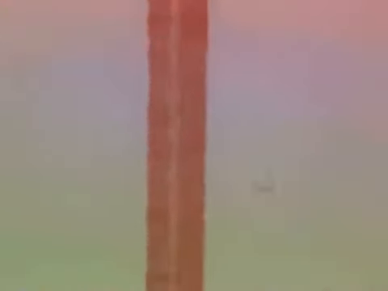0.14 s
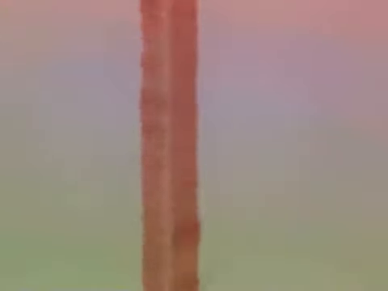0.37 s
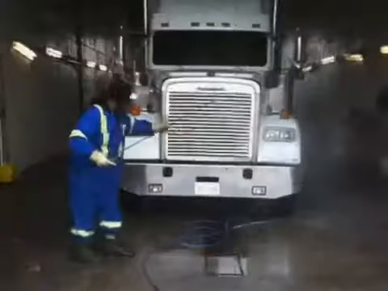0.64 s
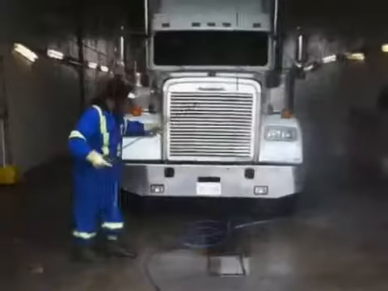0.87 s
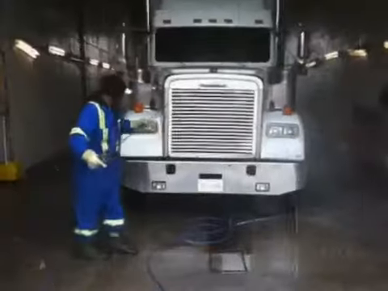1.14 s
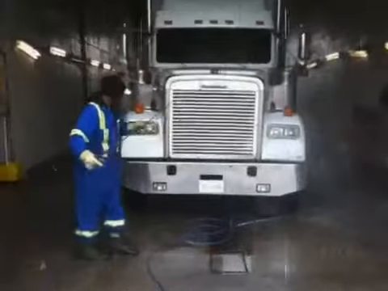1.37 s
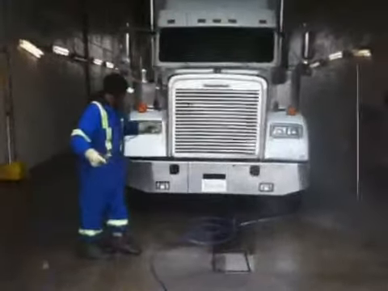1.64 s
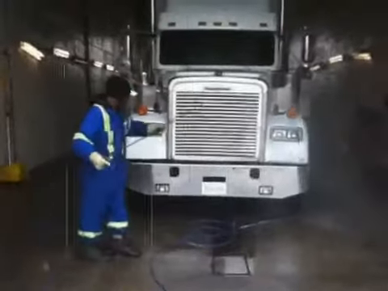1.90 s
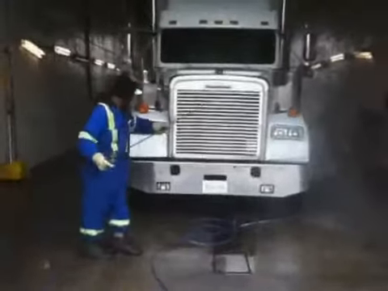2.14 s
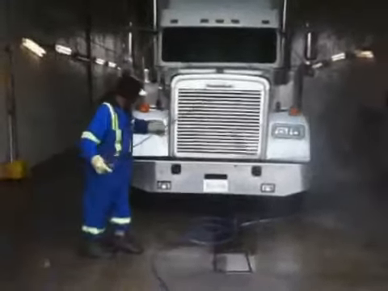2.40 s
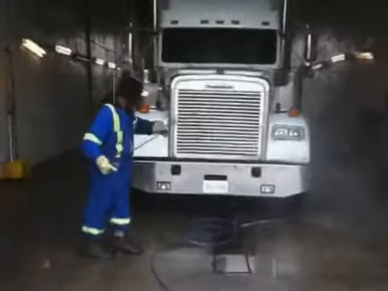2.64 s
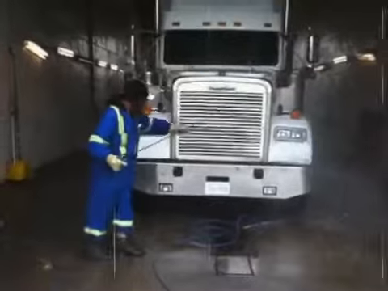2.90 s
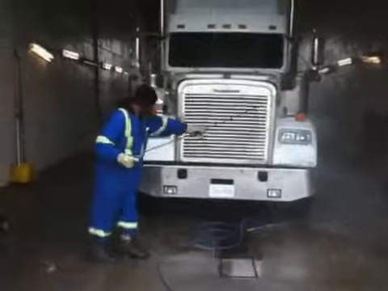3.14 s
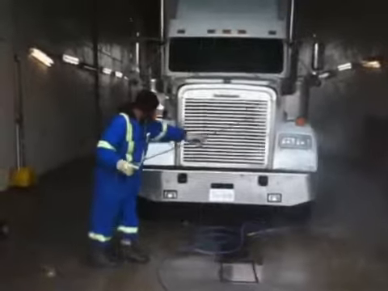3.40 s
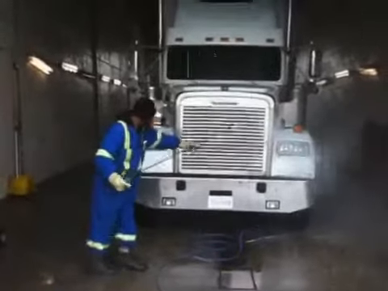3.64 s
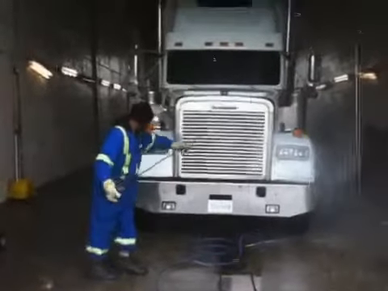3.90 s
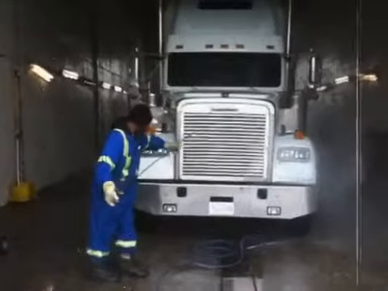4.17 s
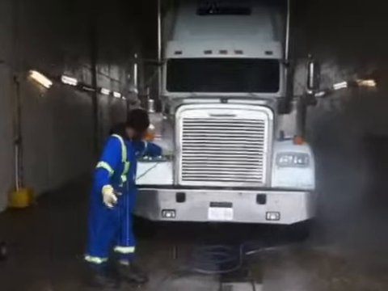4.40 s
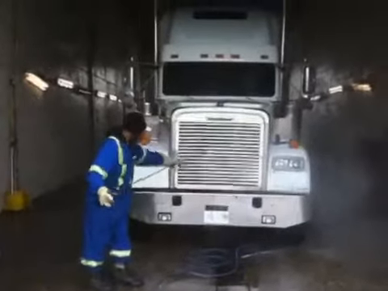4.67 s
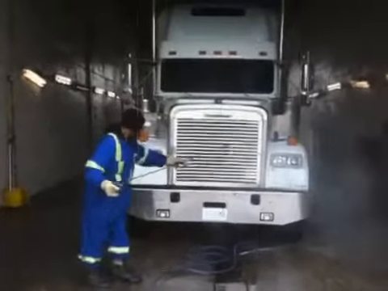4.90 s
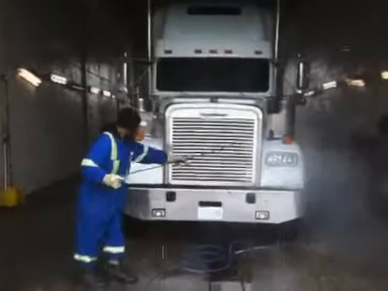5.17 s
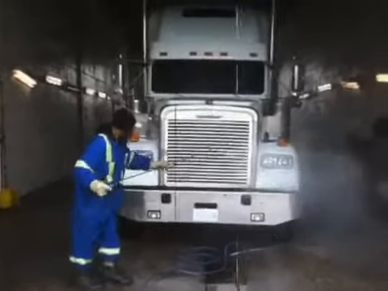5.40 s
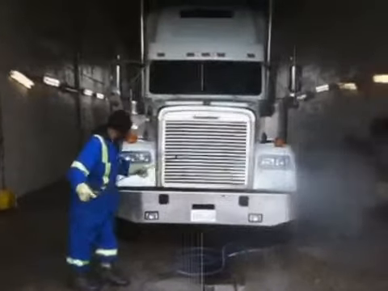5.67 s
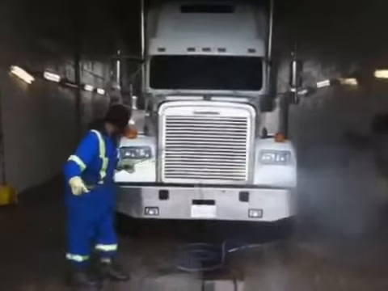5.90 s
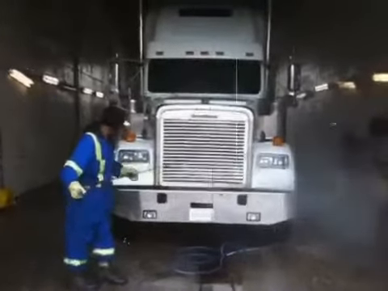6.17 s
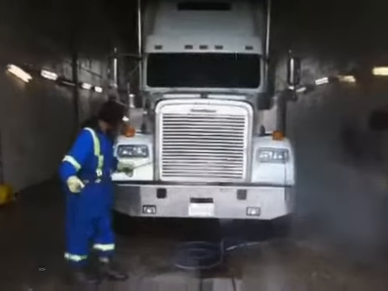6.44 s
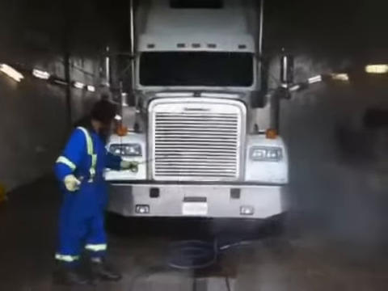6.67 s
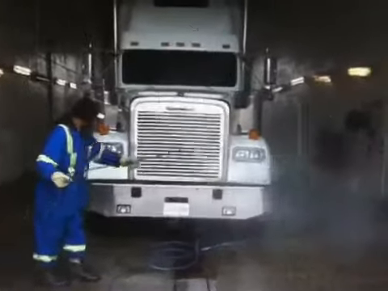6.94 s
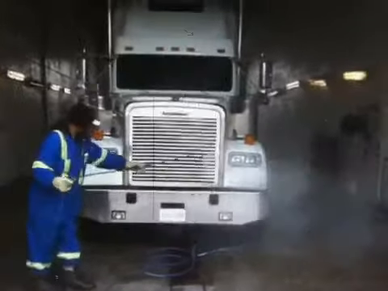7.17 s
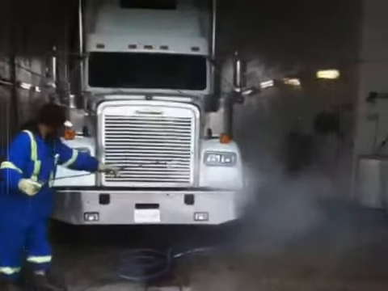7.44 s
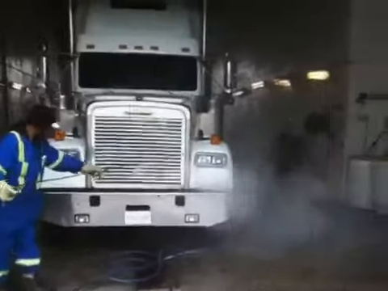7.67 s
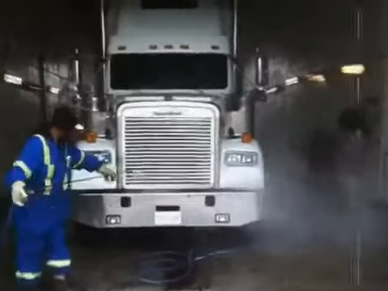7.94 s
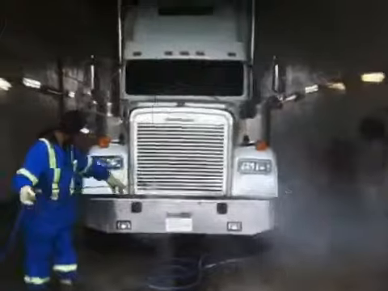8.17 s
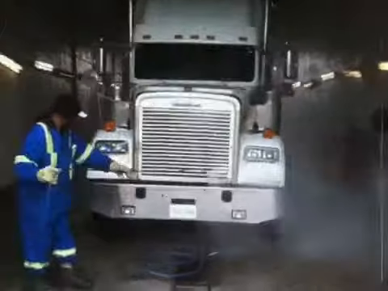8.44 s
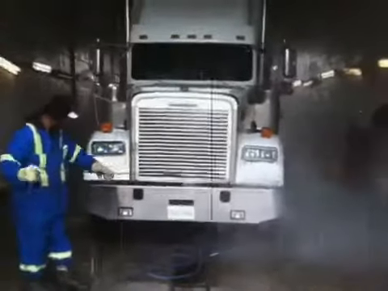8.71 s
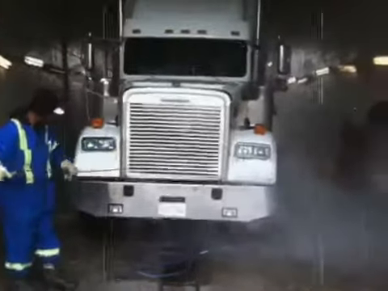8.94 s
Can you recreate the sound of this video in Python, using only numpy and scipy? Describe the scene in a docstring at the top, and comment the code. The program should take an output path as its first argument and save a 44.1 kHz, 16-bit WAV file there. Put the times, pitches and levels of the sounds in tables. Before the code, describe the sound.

One microphone in a concrete wash bay, mono. After a short silence, continuous high-pressure water starts abruptly: nozzle hiss with faint airy whistle, drops battering metal slats, fine bright mist. The colour shifts as the aim sweeps, with quick surges and dips. Around seven to nine seconds panels drum more heavily and hollows boom. A quiet wavering pump hum and bass rumble continue underneath.

```python
"""A high-pressure jet sweeps over the grille and bumper of a truck in a concrete wash bay, after an abrupt start.
Drops batter the slats and the panels drum: noise and random impacts through broad resonances, with the nozzle hiss.
Gliding and fixed narrow noise bands give the grazed slats and the nozzle whistle; brighter spray is the mist.
Shaped noise makes the hollow boom, the roar and the building rumble; wavering sines make the pump hum."""
import sys
import numpy as np
from scipy import signal
from scipy.fft import rfft, irfft, next_fast_len
from scipy.io import wavfile
from scipy.ndimage import uniform_filter1d, map_coordinates

SR = 44100
rng = np.random.default_rng(int(sys.argv[2]) if len(sys.argv) > 2 else 0)


def boost(x):
    """Linear amplitude factor 10**(x/20) for a level x in decibels (scalar or array-like)."""
    u = np.asarray(x, float) / 20
    return 10 ** u


def pcm_store(signal):
    """Save signal as 16-bit PCM."""
    levels = np.round(np.clip(np.atleast_2d(signal), -1, 1) * 32767)
    wavfile.write(sys.argv[1], SR, levels.astype(np.int16).T)


N = 399987
START_S, TOP_HZ = 0.672, 15740

# Base levels where the jet lands. Each row: time in seconds, splash on slats in dB,
# drumming of panels in dB, nozzle hiss in dB.
JET_LEVELS = [(.68, -30.5, -34.5, -30.5), (.8, -29, -32.5, -29.5), (1.1, -26, -33.5, -28),
              (1.55, -25.5, -32, -27.5), (2.05, -28.5, -33.5, -31), (2.4, -24.5, -32, -28),
              (2.95, -23, -31.5, -28.5), (3.4, -23.5, -30, -29), (3.65, -27, -33.5, -30),
              (4.15, -25.5, -31.5, -28), (4.8, -23.5, -30, -27), (5.25, -22.5, -30, -29.5),
              (5.5, -25.5, -32.5, -29), (6.05, -23, -31, -27.5), (6.8, -22.5, -29, -29),
              (7.15, -22, -22.5, -30), (7.55, -21, -23, -29.5), (8.05, -22.5, -20.5, -31.5),
              (8.38, -20.5, -24, -28.5), (8.89, -21.5, -24.5, -30), (8.95, -24, -30.5, -26.5),
              (9.07, -22, -34, -29)]
# Tilt of the metal's colour as the jet's aim moves. Each row: time in seconds,
# slat slope in dB per octave, panel slope in dB per octave.
METAL_TILT = [(.68, 1, 2), (.95, 3, -2), (1.33, 6, -3), (1.6, 7, 3), (2.1, 2, -2), (2.35, 0, 0),
              (2.57, 5, 5), (2.87, 2.5, 0.5), (4.2, 2, 2), (4.56, -1.8, 1), (5.8, -1, 2), (6.99, -2, 1.3),
              (7.24, -1.6, -.8), (7.97, 0.5, 2), (8.6, 4, -.6), (9.07, -1, -6)]
# Broad resonances. Each row: centre in Hz, width scale in Hz, relative level in dB.
SLAT_MODES = [(1944, 466, 2), (2490, 540, -0.5), (2867, 1050, -4)]
PANEL_MODES = [(450, 110, -9), (823, 246, 0), (1033, 550, -4), (1356, 450, 0.5), (5370, 1360, -13)]
# Nozzle hiss colour. Each row: frequency in Hz, relative density in dB per Hz.
HISS_COLOUR = [(2000, -46), (3400, -4.5), (6870, -2), (7850, -2.5), (11500, -7.5), (15000, -50),
               (22000, -120)]

# The jet slips off the metal. Each row: middle in seconds, width at half height in seconds, signed loss in dB.
MISSES = [(1.29, .04, 2.5), (1.36, .06, 2.5), (1.86, 0.057, 7.5), (2.71, 0.24, 4.5), (3.03, .05, 1.5),
          (3.18, 0.077, 2), (3.55, 0.063, 2), (3.69, 0.043, 1.5), (3.85, .1, -0.5), (4.21, .05, 1.5),
          (4.44, .13, 5.5), (4.63, 0.14, 2), (6.48, 0.21, 5), (6.65, 0.093, 5), (7.72, 0.15, 2),
          (8.66, .06, 1.5)]
# The jet strikes a rim or bar squarely. Each row: middle in seconds, width at half height in seconds,
# signed gain in dB.
STRIKES = [(.68, 0.041, 5), (1.08, .05, -0.5), (1.45, 0.055, 1.5), (1.55, .08, 1), (1.92, 0.12, 4.5),
           (2.51, 0.15, 3), (3.07, 0.041, 1.5), (3.32, .05, 2), (3.93, 0.045, 0), (4.35, .07, 2.5),
           (4.54, 0.08, 2), (4.71, .06, 2.5), (5.1, 0.033, 4.5), (5.28, .05, 4), (5.86, 0.026, 3.5),
           (6.27, 0.049, 4.5), (6.36, 0.1, 4), (6.57, 0.029, 3), (6.72, 0.031, 4), (7.08, 0.041, 4),
           (7.65, 0.071, 1.5)]
# Level change of each layer: dB per dB of miss, dB per dB of strike.
SPLASH_FOLLOWS, DRUM_FOLLOWS, HISS_FOLLOWS = (-1, 1), (-1.08, 0.63), (-0.25, 0.6)
GRAZE_FOLLOWS, MIST_FOLLOWS, ROAR_FOLLOWS = (-1, 1), (0.66, 0.29), (-0.25, 0.1)

# The jet grazes a slat. Each row: time in seconds, centre in Hz, half width at half amplitude in Hz,
# base level in dB.
GRAZE = [(.68, 4600, 400, -46), (1.3, 4700, 300, -46), (1.65, 4600, 300, -38), (2.0, 3700, 400, -48),
         (2.25, 3880, 450, -33.5), (2.5, 4080, 450, -28.5), (2.7, 3830, 450, -34.5), (3.4, 4360, 400, -37),
         (3.7, 4660, 180, -37), (4.35, 4750, 180, -35), (4.6, 4480, 220, -35), (5.8, 4530, 250, -37),
         (6.99, 4550, 400, -36), (7.3, 4750, 550, -32), (7.97, 4660, 550, -32.5), (8.6, 4400, 450, -34.5),
         (9.07, 4460, 400, -37)]
# Two nozzle whistle bands. Each row: time in seconds, lower band level in dB, upper band level in dB.
WHISTLE_LEVELS = [(.68, -44, -36), (.9, -39, -41), (1.9, -39, -41), (2.5, -41, -37), (3.1, -44, -36.5),
                  (3.7, -46, -37), (4.3, -50, -53), (4.8, -50, -46), (6.4, -52, -45), (7.5, -60, -56),
                  (8.6, -57, -53), (9.0, -48, -47)]
WHISTLE_HZ, WHISTLE_HALF_WIDTH_HZ = (7230, 7880), 210

# The jet fills a hollow. Each row: middle in seconds, width at half height in seconds, rise in dB.
BOOM_SWELLS = [(.7, 0.045, 13), (1.97, 0.029, 12), (2.6, 0.16, 8), (3.25, 0.088, 14.5), (5.07, 0.056, 6),
               (5.33, 0.18, 9.5), (7.37, 0.39, 19), (8.72, 0.3, 18)]
# Hollow colour. Each row: frequency in Hz, relative density in dB per Hz.
BOOM_COLOUR = [(100, -60), (150, -17), (200, -9), (300, 0), (450, -1), (560, -11), (800, -35), (1360, -120)]
BOOM_FLOOR_DB = -48
BUMP_SHARPNESS = 2.3  # 2 a round bump, more a flatter top

# Background base levels. Each row: time in seconds, low roar in dB, fine mist in dB.
BAY_LEVELS = [(.68, -38.5, -32.5), (1.45, -39, -34), (1.75, -40.5, -32.5), (2.0, -39, -33),
              (2.6, -39.5, -32.5), (3.05, -40.5, -39), (3.5, -39, -34), (3.8, -40, -39.5),
              (4.3, -39.5, -31.5), (4.95, -40.5, -39), (6.05, -40, -33), (6.8, -40.5, -38.5),
              (7.3, -38.5, -39.5), (8.7, -33, -39.5), (9.02, -36.5, -31), (9.07, -38, -35)]
# Mist, roar and building rumble colours. Each row: frequency in Hz, relative density in dB per Hz.
MIST_COLOUR = [(6500, -4), (11000, 2.5), (12200, 1), (13500, 4.5), (14500, -1.5), (15600, 5.5),
               (16600, 1.5)]
ROAR_COLOUR = [(68, -61), (115, -16), (134, -7.5), (167, -8.5), (195, -5), (280, -4), (338, -1.5),
               (554, -13), (620, -14), (810, -16), (1360, -120)]
RUMBLE_COLOUR = [(15, -43), (25, -13), (38, -13), (55, 1), (64, -4), (86, 8), (100, 5), (130, -32),
                 (220, -120)]
RUMBLE_DB = -66

# Pump overtones. Each row: multiple of the stroke rate, base rms level in dB.
PUMP_OVERTONES = [(2, -55), (5, -45)]
PUMP_HZ, BEATING_MULTIPLE = 68.5, 3
# Beat of that multiple: mean level, time between swells, time of one peak, depth 0-1.
BEAT_DB, BEAT_PERIOD_S, BEAT_PEAK_S, BEAT_DEPTH = -48, 2.39, 4.64, 0.69


def jet():
    """One flutter, as the jet crosses slats, shakes the splash, drumming and hiss together."""
    splash_db, drum_db, hiss_db = curves(JET_LEVELS)
    flutter = wobble(30)
    return splash(splash_db, flutter) + drum(drum_db, flutter) + hiss(hiss_db, flutter)


def splash(base_db, flutter):
    """Drops batter the slats: noise and impacts through resonances whose tilt follows the aim."""
    s, slope_db, _ = np.transpose(METAL_TILT)
    colour = tilted(resonances(SLAT_MODES, 1.91), s, slope_db, 2230)
    level_db = base_db + contact(SPLASH_FOLLOWS) + 0.43 * flutter + 0.3 * wobble(70)
    return boost(level_db) * spray(colour, 0.74, 1.9, -11, 2500)


def drum(base_db, flutter):
    """Panels drum: noise and sparser, stronger impacts through lower resonances."""
    s, _, slope_db = np.transpose(METAL_TILT)
    colour = tilted(resonances(PANEL_MODES, 1.77), s, slope_db, 1020)
    level_db = base_db + contact(DRUM_FOLLOWS) + 0.45 * flutter + 0.72 * wobble(14)
    return boost(level_db) * spray(colour, 0.25, 1.0, -6.5, 1500)


def hiss(base_db, flutter):
    """Nozzle turbulence: treble spray of fixed colour."""
    level_db = base_db + contact(HISS_FOLLOWS) + 0.75 * flutter + 0.39 * wobble(12)
    return boost(level_db) * spray(still(spectrum(HISS_COLOUR)), 0.27, 2.3, -5, 4000)


def graze():
    """A hiss band glides in pitch and width as the jet grazes a slat."""
    s, centre_hz, half_width_hz, _ = np.transpose(GRAZE)
    _, _, base_db = curves(GRAZE)
    level_db = base_db + contact(GRAZE_FOLLOWS)
    return boost(level_db) * spray(gliding(s, centre_hz, half_width_hz), 2.1, 2.1, -6, 3000)


def whistle():
    """The nozzle whistles in two fixed narrow bands of noise."""
    total = np.zeros(N)
    for centre_hz, level_db in zip(WHISTLE_HZ, curves(WHISTLE_LEVELS)):
        colour = gliding([0], [centre_hz], [WHISTLE_HALF_WIDTH_HZ])
        total += boost(level_db) * spray(colour, 2.9, 1.2, -18, 3000)
    return total


def boom():
    """A hollow filled by the jet booms: low noise swells above a quiet floor."""
    return boost(BOOM_FLOOR_DB + bumps(BOOM_SWELLS)) * steady(BOOM_COLOUR)


def mist(base_db):
    """Fine droplets: bright spray that rises when the jet misses the metal."""
    level_db = base_db + contact(MIST_FOLLOWS) + 1.2 * wobble(16)
    return boost(level_db) * spray(still(spectrum(MIST_COLOUR)), 1.5, 1.2, -14, 5000)


def roar(base_db):
    """Water roars in the bay: low noise of fixed colour, wavering in level."""
    level_db = base_db + contact(ROAR_FOLLOWS) + 1.1 * wobble(11)
    return boost(level_db) * steady(ROAR_COLOUR)


def pump():
    """Overtones of the plunger strokes share a wavering rate; one beats, and each wavers in strength."""
    phase = 2 * np.pi * np.cumsum(PUMP_HZ * (1 + 0.0008 * wobble(1.7))) / SR
    hum = np.zeros(N)
    for multiple, base_db in PUMP_OVERTONES:
        tone = np.sin(multiple * phase + rng.uniform(0, 2 * np.pi))
        hum += boost(base_db + 0.84 * wobble(3.4)) * tone
    swell_phase = 2 * np.pi * (np.arange(N) / SR - BEAT_PEAK_S) / BEAT_PERIOD_S
    beat = 1 + BEAT_DEPTH * np.cos(swell_phase)
    hum += boost(BEAT_DB + 1.3 * wobble(2.46)) * beat * np.sin(BEATING_MULTIPLE * phase)
    return np.sqrt(2) * hum  # sine peak from rms


def rumble():
    """Building rumble: bass noise at a constant level."""
    return boost(RUMBLE_DB) * steady(RUMBLE_COLOUR)


def spray(colour, patchy_db, ripple_db, drops_db, drops_per_s):
    """Turbulence plus drop impacts, coloured, in patches and slowly drifting wall interference; rms 1."""
    hits = rng.random(N) < drops_per_s / SR
    drops = unit(rng.standard_normal(N) * hits)
    raw = rng.standard_normal(N) + boost(drops_db) * drops
    hz, t, z = signal.stft(raw, SR, nperseg=1024)
    field_db = patchy_db * patches(z.shape, 10, 9) + ripple_db * patches(z.shape, 3, 28)
    z = z / (1 + (350 / (hz[:, None] + 1)) ** 4)  # small drops make little bass
    z = z * colour(hz[:, None], t[None, :]) * boost(field_db)
    return unit(signal.istft(z, SR, nperseg=1024)[1][:N])


def steady(points):
    """Plain noise of rms 1 with a fixed spectrum."""
    size = next_fast_len(N)
    gain = spectrum(points)(np.fft.rfftfreq(size, 1 / SR))
    return unit(irfft(rfft(rng.standard_normal(size)) * gain, size)[:N])


def contact(follows):
    """A layer's level change in dB as the jet misses or strikes the metal."""
    return follows[0] * bumps(MISSES) + follows[1] * bumps(STRIKES)


def bumps(rows):
    """A dB curve: the sum of one smooth bump per (middle s, width s, height dB) row."""
    t = np.arange(0, N + 64, 64) / SR
    s, width_s, db = np.transpose(rows)[:, :, None]
    shape = 0.5 ** (np.abs(2 * (t - s) / width_s) ** BUMP_SHARPNESS)
    return np.interp(np.arange(N) / SR, t, np.sum(db * shape, axis=0))


def resonances(modes, steep):
    """Gain over frequency of broad resonances, added as powers."""
    def gain(hz):
        return np.sqrt(sum(boost(db) ** 2 / (1 + (2 * (hz - c) / w) ** 2) ** steep for c, w, db in modes))
    return gain


def tilted(colour, s, slope_db, pivot_hz):
    """A colour with a moving slope about a pivot, flat beyond one octave either side."""
    def gain(hz, t):
        octaves = np.clip(np.log2((hz + 1) / pivot_hz), -1, 1)
        return colour(hz) * boost(np.interp(t, s, slope_db) * octaves)
    return gain


def gliding(s, centre_hz, half_width_hz):
    """A resonance whose centre and width follow time curves."""
    def gain(hz, t):
        offset = (hz - np.interp(t, s, centre_hz)) / np.interp(t, s, half_width_hz)
        return 1 / (1 + offset ** 2)
    return gain


def still(colour):
    """A colour that does not change with time."""
    return lambda hz, t: colour(hz)


def spectrum(points):
    """Gain over frequency through (Hz, dB) points on a log axis."""
    f, db = np.transpose(points)
    return lambda hz: boost(np.interp(np.log(hz + 1), np.log(f + 1), db))


def patches(shape, bins, frames):
    """A random field of rms 1, smoothed over frequency bins and time frames."""
    field = uniform_filter1d(rng.standard_normal(shape), size=bins, axis=0)
    return unit(uniform_filter1d(field, size=frames, axis=1))


def wobble(knots_per_s):
    """A smooth random curve through normal random knots."""
    knots = rng.standard_normal(int(N * knots_per_s / SR) + 4)
    return map_coordinates(knots, [np.arange(N) * knots_per_s / SR])


def curves(rows):
    """One value per sample for each column after the time."""
    s, *cols = np.transpose(rows)
    return [np.interp(np.arange(N) / SR, s, c) for c in cols]


def unit(x):
    """Scaled to rms 1."""
    return x / np.sqrt(np.mean(x ** 2) + 1e-20)


def scene():
    """All sources summed, the same in both channels as from one microphone."""
    roar_db, mist_db = curves(BAY_LEVELS)
    sound = jet() + graze() + whistle() + boom() + mist(mist_db) + roar(roar_db) + pump() + rumble()
    return np.array([sound, sound])


def roll_off(x):
    """The treble ends steeply here."""
    return signal.sosfilt(signal.butter(12, 17090, fs=SR, output="sos"), x)


def record(dry):
    """One microphone: a dip where the floor echo cancels, a sharp band limit, silence before the start."""
    size = next_fast_len(N)
    hz = np.fft.rfftfreq(size, 1 / SR)
    floor_dip = boost(-4.5 / (1 + ((hz - 585) / 45) ** 2))
    heard = irfft(rfft(dry, size) * floor_dip * (hz < TOP_HZ), size)[:, :N]
    heard = heard * (np.arange(N) >= START_S * SR)
    return roll_off(heard)


dry = scene()
out = record(dry)
pcm_store(out)
```